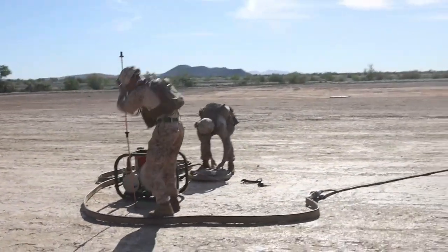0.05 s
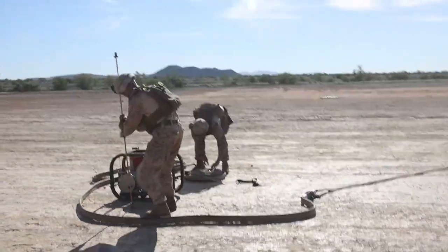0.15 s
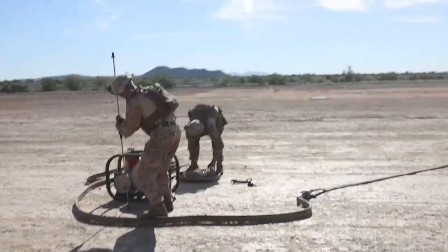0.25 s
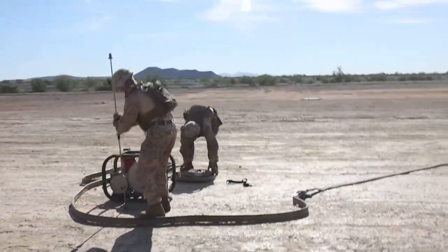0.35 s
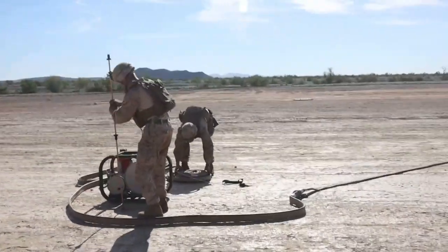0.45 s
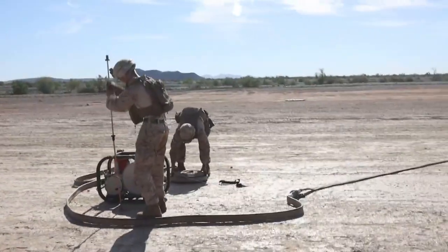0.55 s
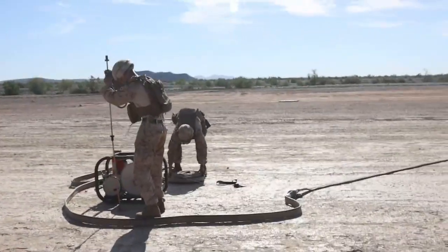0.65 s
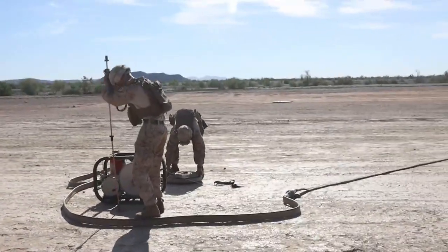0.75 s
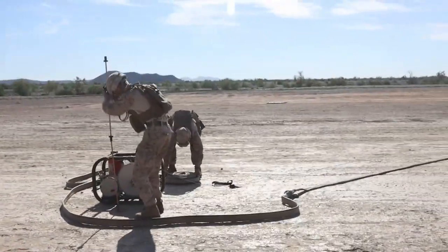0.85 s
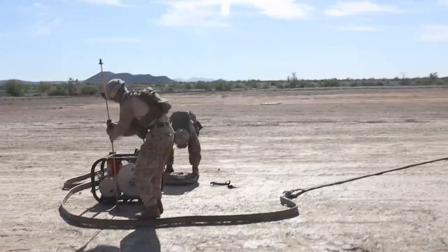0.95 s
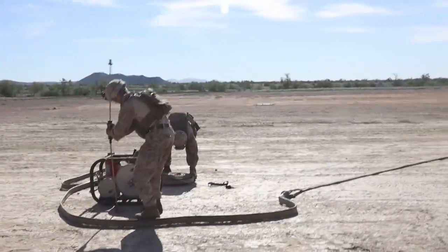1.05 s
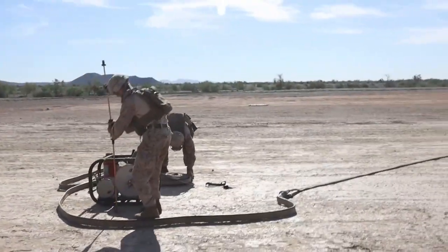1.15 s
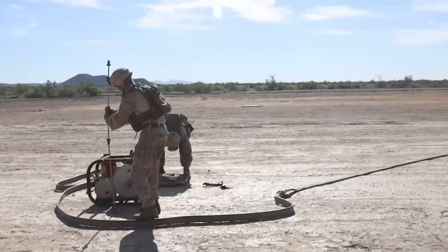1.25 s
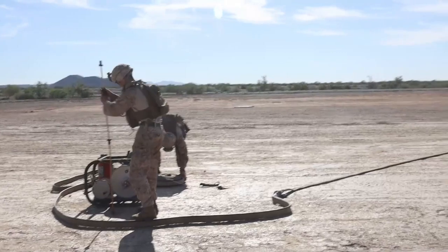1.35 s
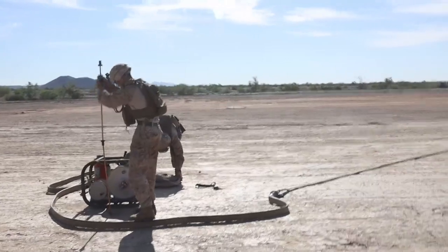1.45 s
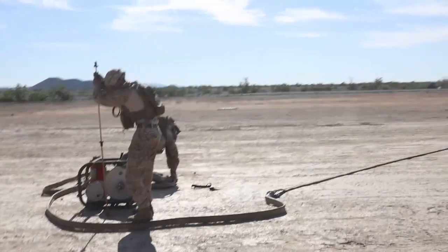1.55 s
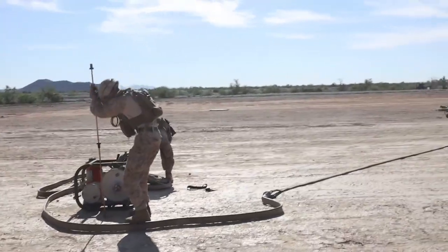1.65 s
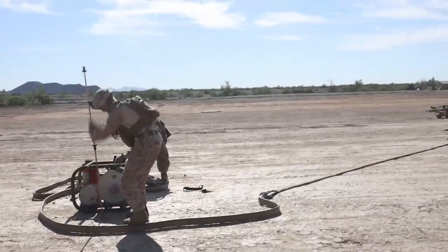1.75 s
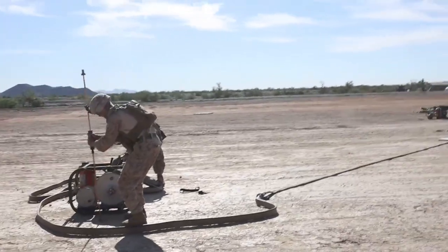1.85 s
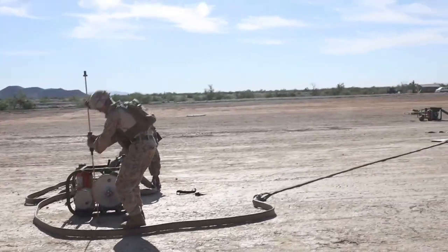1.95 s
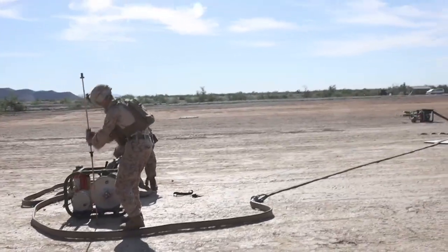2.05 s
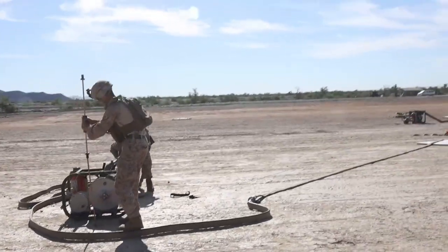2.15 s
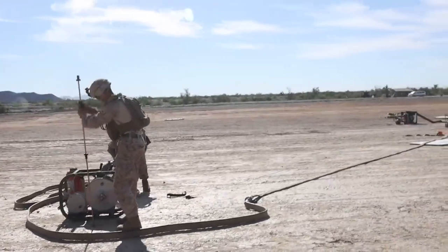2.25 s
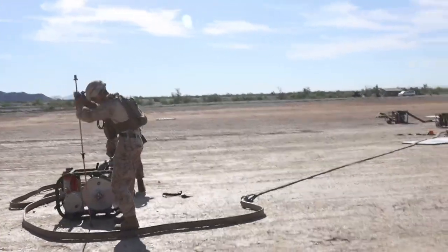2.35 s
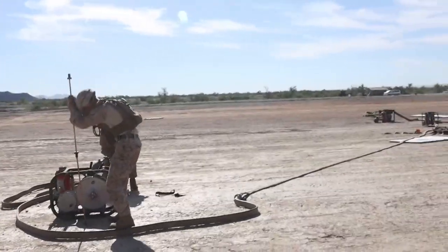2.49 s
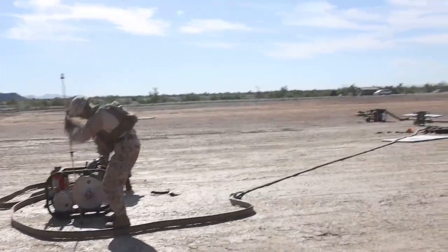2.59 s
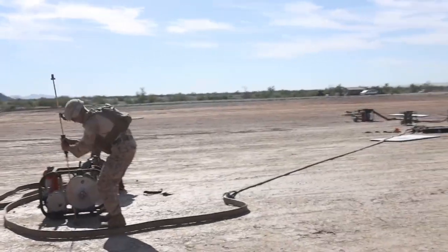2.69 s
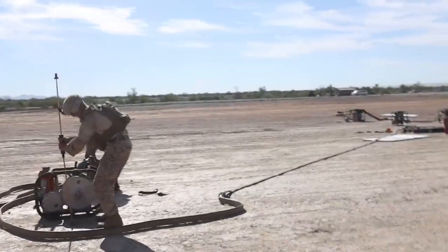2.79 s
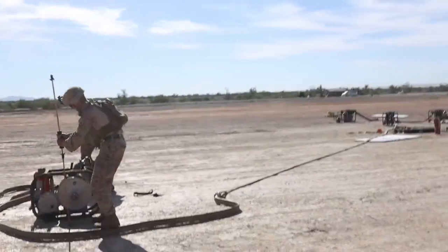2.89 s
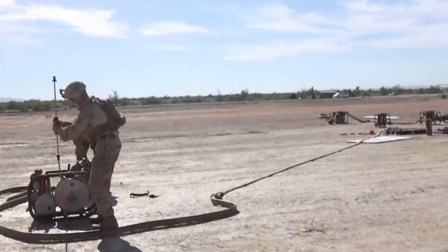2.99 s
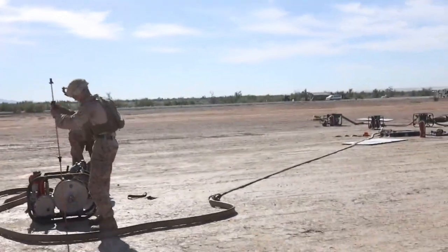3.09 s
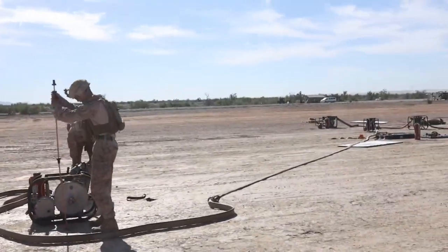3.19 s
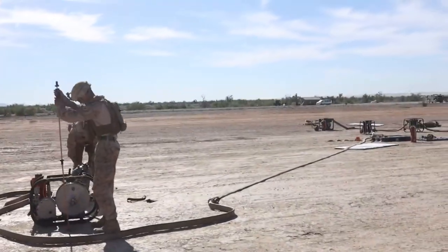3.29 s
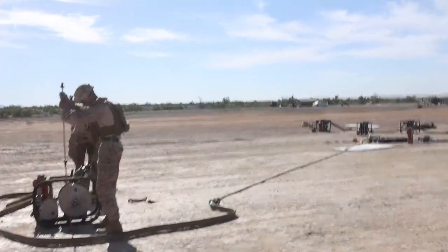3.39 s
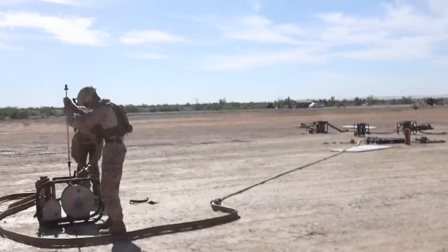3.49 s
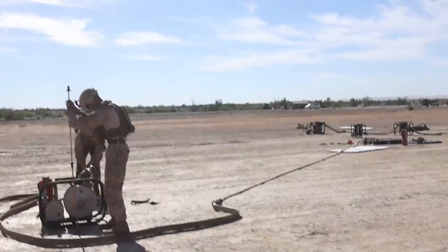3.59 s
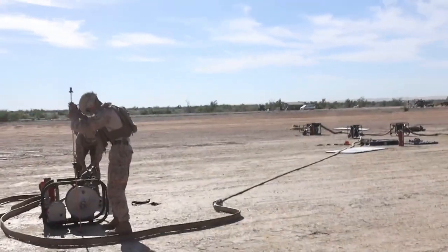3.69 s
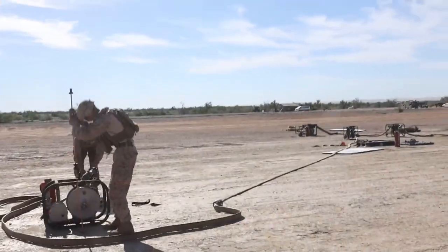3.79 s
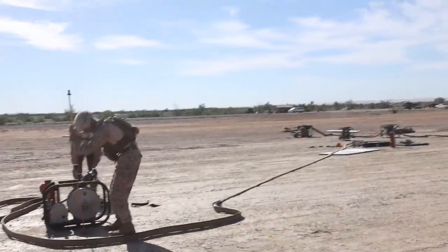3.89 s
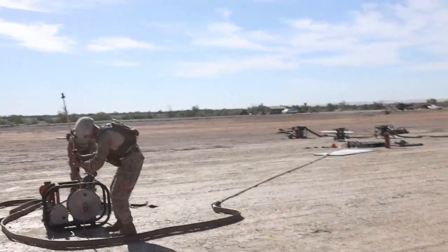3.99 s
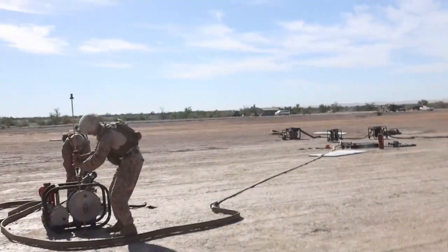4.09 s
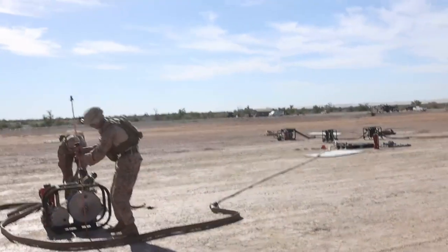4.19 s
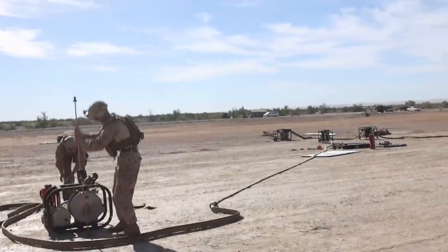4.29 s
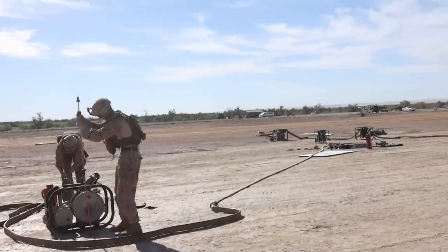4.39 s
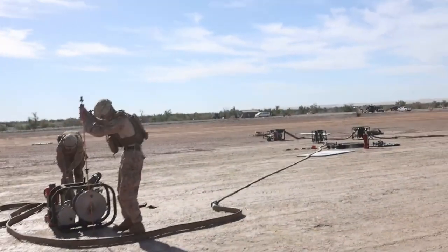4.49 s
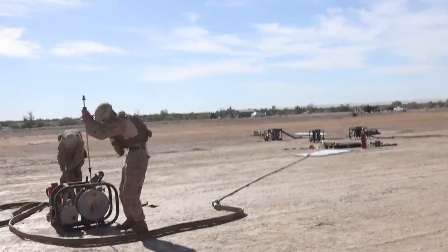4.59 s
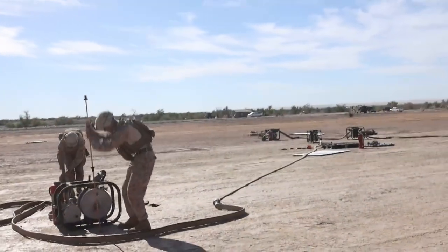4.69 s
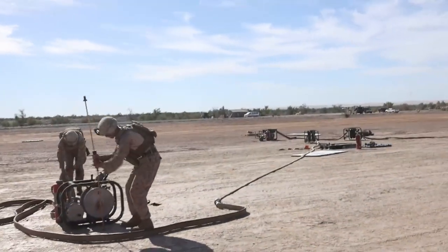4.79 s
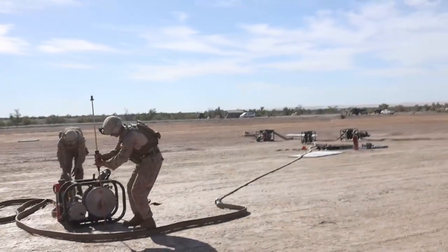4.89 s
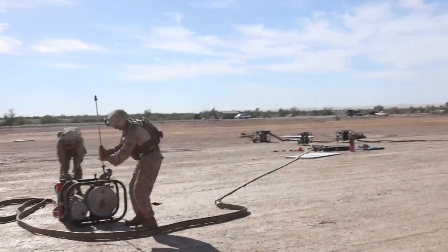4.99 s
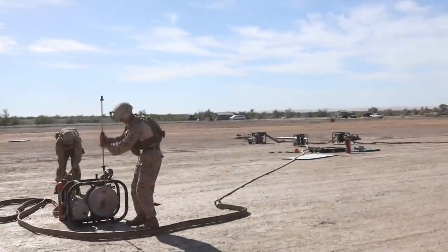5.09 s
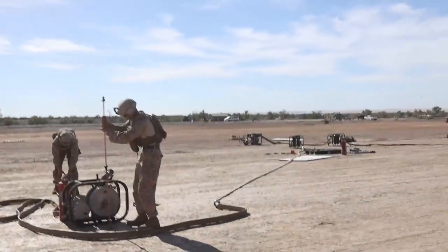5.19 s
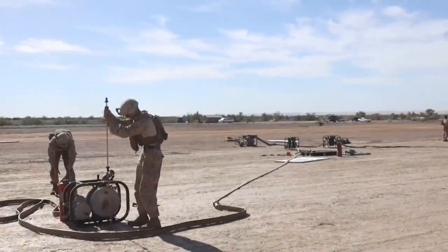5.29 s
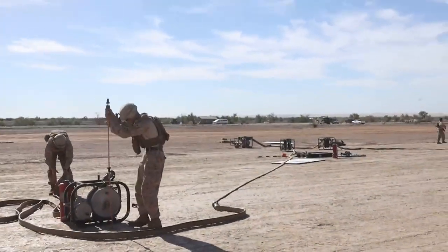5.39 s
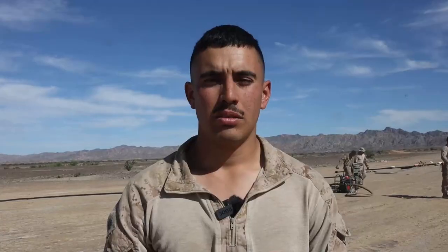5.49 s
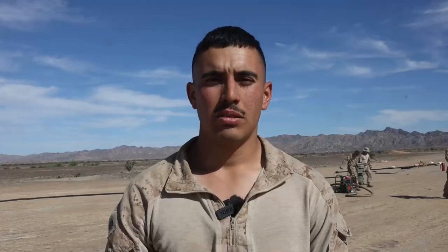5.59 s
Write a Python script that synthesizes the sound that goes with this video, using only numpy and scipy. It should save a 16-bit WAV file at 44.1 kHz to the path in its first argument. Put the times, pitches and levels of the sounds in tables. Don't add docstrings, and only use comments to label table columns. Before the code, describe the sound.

A steel sleeve slams six times onto a ground rod outdoors, with scrapes and rattles between blows and wind buffeting mainly the right side.

```python
import sys
import numpy as np
from scipy import signal
from scipy.fft import rfft, irfft
from scipy.io import wavfile
from scipy.ndimage import uniform_filter1d

SR = 44100
rng = np.random.default_rng(int(sys.argv[2]) if len(sys.argv) > 2 else 0)


def how_loud(loudness_db):
    steps = np.asarray(loudness_db, float) / 20
    return 10 ** steps


def int16_out(signal):
    q = np.round(np.clip(np.atleast_2d(signal).T, -1, 1) * 32767)
    wavfile.write(sys.argv[1], SR, q.astype(np.int16))


N = 249165

CUT_S = 5.452
PORT_LAG_SAMPLES = 3.73

# (frequency [Hz], level [dB])
DESERT_AIR = [(18, -31), (30, -5), (86, -3.5), (266, -2.5), (437, -20), (526, -16), (1010, -24),
              (2680, -28.5), (3400, -33), (3980, -34), (16000, -48.5)]
DESERT_AIR_DB = -72
# (frequency [Hz], level [dB])
QUIET_AIR = [(18, -50.5), (30, -25), (100, 4.5), (145, 4), (584, -17), (822, -27), (1190, -30), (3000, -39),
             (16000, -51)]
QUIET_AIR_DB = -73.5

# (time [s], level [dB])
GUSTS = [(0.0, -41), (0.12, -41.5), (0.2, -43.5), (0.32, -39.5), (0.55, -38.5), (0.7, -35), (0.82, -39),
         (0.96, -38.5), (1.15, -44), (1.5, -39), (1.85, -43), (2.33, -42), (2.6, -42.5), (3.0, -56.5),
         (3.4, -48.5), (3.58, -53.5), (3.83, -44), (3.93, -64)]
# (time [s], half length [s], level [dB])
RIGHT_PUFFS = [(1.7, 0.019, -43.5), (2.502, 0.01, -40.5), (4.104, 0.076, -59.5), (4.267, 0.026, -62.5),
               (4.465, 0.02, -56.5), (4.55, 0.02, -58.5), (4.752, 0.037, -56.5), (5.038, 0.066, -56.5),
               (5.283, 0.02, -53), (5.397, 0.038, -56.5)]
# (time [s], half length [s], level [dB])
LEFT_PUFFS = [(0.051, 0.043, -53), (0.6, .1, -67), (0.7, 0.031, -59.5), (1.931, 0.028, -47.5),
              (1.999, 0.019, -63), (2.36, .04, -68), (2.85, 0.12, -48.5), (2.979, 0.1, -44),
              (3.141, 0.044, -44.5), (3.333, 0.12, -47.5), (3.69, 0.078, -53.5), (3.87, 0.031, -45.5),
              (4.15, 0.089, -64), (4.299, 0.049, -51), (4.46, 0.032, -52.5), (4.93, 0.042, -56),
              (5.05, 0.054, -56)]
LEE_CALM_DB = -70.5
SHARP_SLOPE, SHARP_DB = 0.859, 22
# (time [s], peak [dB], time scale [ms])
SLAPS = [(0.131, -35, 0.61), (0.427, -37.5, 0.48), (0.489, -35.5, 0.56), (0.522, -35, 0.61),
         (0.612, -37, 0.56), (0.679, -32.5, 0.46), (0.691, -35, 0.45), (0.717, -33, 0.55),
         (0.742, -36.5, 0.41), (0.967, -32, 0.55), (1.139, -44.5, 0.66), (1.151, -36, 0.55),
         (0.845, -36.5, 0.54), (0.95, -26, 0.57), (1.049, -34, 0.57), (1.169, -40.5, 0.73),
         (1.557, -40, 0.48), (1.682, -33.5, 0.59), (2.109, -32.5, 0.74), (2.277, -32, 0.97),
         (2.355, -28.5, 0.93), (2.469, -41.5, 0.5), (2.505, -33, 0.78), (2.801, -38.5, 1),
         (3.873, -40, 0.9)]

# (time [s], peak [dB], grit [dB], length [ms])
SCUFFS = [(0.078, -50.5, -8, 7.6), (1.342, -43, 2, 3.7), (1.376, -28.5, -9, 1.5), (3.16, -47, -13, 8.5),
          (3.242, -64.5, 2, 11.3), (3.303, -51.5, -3, 2.8), (3.381, -49.5, -2, 3), (3.401, -52.5, 5.5, 5),
          (4.098, -63.5, 19, 4.8), (4.436, -53.5, -9, 5.1), (4.447, -67.5, -5, 31), (4.497, -66, -1.5, 15),
          (4.521, -50.5, -0.5, 2.4), (5.018, -53, -2.5, 3.2), (5.04, -47, -10, 9.5),
          (5.054, -64.5, 10, 15.4), (5.174, -57.5, 0, 5.9)]
# (frequency [Hz], level [dB])
SOIL = [(80, -19.5), (400, 5), (1200, -11), (3500, -16.5), (8000, -33.5), (16000, -73)]

ROD_HZ = [4250, 5040, 5950, 6630, 7500, 8520, 9470, 10500, 11600, 12700, 13800, 14400]
# (level [dB], time to fall 60 dB [s])
ROD_RING = [(-5.5, .07), (-3, 0.076), (-9, 0.079), (2, .09), (-8.5, 0.06), (-6.5, 0.087), (-4, 0.057),
            (-4.5, .09), (-4.5, 0.05), (-7, .09), (-5, .1), (-13.5, 0.14)]
# (frequency [Hz], level [dB], time to fall 60 dB [s])
LINGER = [(2440, -28.5, 0.079), (3390, -17.5, .12), (5440, -28.5, 0.16), (5500, -25, 0.077),
          (6583, -23.5, 0.23), (8470, -24, 0.093), (9450, -29, 0.052), (11000, -29.5, 0.088),
          (11500, -31.5, 0.051), (14500, -27, 0.097)]
TICK_RING_DB = 3
# (time [s], level [dB], treble [dB])
CHIMES = [(0.054, -79, -23), (0.243, -67.5, 1), (1.069, -67, -1.5), (1.125, -72, 6), (1.201, -71, -10),
          (1.248, -69, -6), (1.3, -62, 3), (1.3456, -60, -8), (1.439, -75, -1), (1.897, -68.5, -14.5),
          (2.081, -74, -10), (2.114, -81, -4), (2.743, -77, -8), (2.77, -85, -10), (2.932, -90, -5.5),
          (3.01, -84, -7), (3.048, -84, -2), (3.072, -71.5, -2), (3.664, -81.5, -8), (4.393, -75, -11),
          (5.191, -67, 3.5)]

# (frequency [Hz], level [dB], time to fall 60 dB [s])
SLEEVE = [
    (3420, 2.5, 0.0044),
    (3663, -6, 0.017),
]
# (frequency [Hz], level [dB], time to fall 60 dB [s])
LOOSE = [(2207, -10.5, 0.025), (3180, -1.5, 0.028), (4600, -6, 0.1), (5465, -3, 0.021), (5683, 2, 0.016),
         (6600, 6, 0.12), (7320, -13.5, 0.019), (8460, -3.5, 0.017), (9900, -13, 0.016),
         (10500, -13, 0.032), (12100, -15, 0.016), (12500, -24, 0.081), (13900, -22, 0.12),
         (13300, -12, 0.059)]
LONGEST_T60_S = 0.07
# (frequency [Hz], level [dB])
TAP = [(500, -36.5), (1200, -14), (2200, -4), (3500, -9.5), (6000, 8), (8600, -25.5), (11500, -33.5),
       (14000, -32.5), (14800, -43.5), (16000, -60.5)]
# (time [s], peak [dB], sleeve ring [dB], treble [dB], contact [ms])
BOUNCES = [(0.1449, -64.5, 16.5, 14.5, 1.8), (0.22, -46, 0.5, -3, 3.8), (0.2418, -49, -2, -3, 3.1),
           (1.0113, -41.5, -13, -8.5, 3.8), (1.0687, -44.5, -28, -1, 4.4), (1.8973, -47.5, -25, 3.5, 6.6),
           (1.91, -60, -10, -10, 2.4), (2.742, -43.5, -27, 1, 1.9), (2.77, -56.5, -14, -13.5, 13),
           (4.01, -46, -31.5, 2, 2.5), (4.072, -43, -5, 4.5, 1.2), (4.0873, -61, 0, -13, 6.7),
           (4.7574, -67.5, 23, -4.5, 5.07), (4.803, -51.5, 10, -5, 6.2), (4.8449, -38.5, 8, -2.5, 2.6),
           (4.9392, -61.5, 7, -6, 5.1)]
# (time [s], peak [dB], sleeve ring [dB], treble [dB])
RATTLES = [(0.0537, -59, -38, -16), (0.609, -62, -30, -9), (1.1262, -50.5, -3, -24),
           (1.2, -52.5, 1.5, -14.5), (1.248, -49.5, 8, -7), (1.3008, -51.5, -18, -8.5),
           (1.3455, -62.5, -13, 0), (1.388, -59.5, 18, 5), (1.4387, -59.5, 4.5, 0), (2.08, -54.5, 5, -4),
           (2.1147, -58.5, -13, -3), (2.8866, -71.5, -9, -7.5), (2.932, -51.5, -25, -5),
           (3.0114, -65, -34, -10.5), (3.048, -64.5, -18, -12), (3.072, -59.5, 7, -0.5),
           (3.1646, -70, 19.5, -3.5), (3.6634, -62.5, 10.5, 1), (4.3915, -62, 17, -7.5),
           (5.063, -62.5, 31, -23), (5.1917, -58.5, 8, -3.5), (5.2603, -70.5, 21, -5),
           (0.0287, -76, -10, -20), (0.0925, -70, -9, -18), (1.164, -70, -10, -38),
           (1.2362, -61.5, -2, -32), (1.2887, -66, 14, -20), (1.3363, -64, -1, -15), (1.3698, -64, 14, -14),
           (1.4465, -62.5, -6, -1), (1.514, -72.5, -7, -25), (2.7343, -65.5, -20, 4),
           (2.8598, -72, -9.5, -21), (2.9937, -70, -8, -4), (3.128, -71.5, -5, -15)]
RATTLE_CONTACT_MS = 7.1

# (frequency [Hz], level [dB])
SCRAPE = [(700, -31), (1300, -11), (2300, -7.5), (4500, -10), (6600, -20.5), (10400, -31.5), (16000, -44)]
# (time [s], half length [s], scrape [dB], sleeve ring [dB])
LIFTS = [(0.096, 0.12, -71.5, -98), (0.235, 0.048, -59.5, -69), (0.543, 0.16, -76, -85),
         (1.318, 0.072, -66, -69), (1.96, 0.055, -76.5, -86.5), (2.222, 0.13, -82, -86),
         (1.536, 0.21, -84, -93.5), (3.031, 0.075, -75, -81.5), (3.152, 0.064, -93.5, -84.5),
         (3.411, 0.06, -81, -102.5), (4.302, 0.11, -80.5, -78.5), (4.426, 0.073, -82, -82),
         (4.752, 0.04, -88.5, -68), (4.866, 0.047, -64.5, -87), (5.155, 0.084, -79.5, -78.5),
         (5.273, 0.055, -87, -79.5), (5.361, 0.058, -94, -88)]
# (scrape [dB], sleeve ring [dB])
DROPS = [
    (-61.5, -66.5),
    (-54.5, -69),
    (-58.5, -71),
    (-57, -69.5),
    (-62, -67.5),
    (-65, -67),
]
DROP_RISE_DB_PER_S, DROP_FADE_DB_PER_S = 211.5, 262
SLIDE_REST_DB = -100

# (time [s], peak [dB], sleeve ring [dB], thud [dB], treble [dB])
BLOWS = [
    (0.194, -21.5, -11.5, -16, -0.5),
    (0.9882, -21, -7, -16, 5),
    (1.8221, -22, -9, -34, 1),
    (2.6627, -16.5, 0.5, -17, -1.5),
    (3.9845, -19, 3, -22.5, 4.5),
    (4.822, -20, -4, -16, 2.5),
]
LANDING_HZ = (750, 1600, 3500, 8500, 13500)
# (knock [dB], body [dB], shank [dB], edge [dB])
LANDINGS = [
    (-3.5, -4.5, -0.5, 1),
    (0.5, -2, -3, -0.5),
    (-5, -3.5, -5, 4.5),
    (-2.5, 0.5, 0, 0),
    (2, 3, 6.5, -0.5),
    (0, -3.5, -1.5, -1),
]
# (frequency [Hz], level [dB])
CRACK = [(300, -35), (500, -23), (750, -10.5), (1200, -17), (2000, -8.5), (2800, -15), (3500, -8.5),
         (5000, -12), (6500, -9), (8600, -24), (13800, -23.5), (15300, -24), (16000, -44)]
# (frequency [Hz], level [dB], time to fall 60 dB [s])
STEEL = [(4091, -9.5, 0.084), (3860, 0, 0.084), (4200, -7.5, 0.08), (4820, -4.5, 0.074),
         (5270, -8.5, 0.093), (6600, -4, 0.073), (6820, -4.5, 0.2), (6860, -10, 0.085), (7060, -12, 0.1),
         (8300, -3.5, 0.015), (8570, -0.5, 0.059), (9800, -11, 0.035), (9960, -4.5, 0.059),
         (9200, -11, 0.081), (12300, -5, 0.0091), (10500, -15.5, 0.073), (11940, -15.5, 0.069),
         (11600, -17, 0.052), (16160, -20, 0.036)]
COLLAR_HZ, COLLAR_DB, COLLAR_T60_S = 6480, -12.5, 0.03

RELAND_MS, RELAND_DB = 5.4, -4
RELAND_ABOVE_HZ = 1600
# (frequency [Hz], level against the left port [dB])
SHADE = [(800, 2), (1300, 3.5), (1850, 4.5), (2600, 4), (3500, 0.5), (6000, 3), (11500, 0), (14000, -3)]


def highpass(x, order, hz):
    return signal.sosfilt(signal.butter(order, hz, "high", fs=SR, output="sos"), x)


def colour(x, spectrum, tilt_db=0):
    hz = np.fft.rfftfreq(x.shape[-1], 1 / SR) + 1
    points = np.array(spectrum)
    db = np.interp(np.log(hz), np.log(points[:, 0]), points[:, 1])
    db = db + tilt_db * np.log(hz / 3500) / np.log(4)
    y = irfft(rfft(x) * how_loud(db), x.shape[-1])
    return y / np.sqrt(np.mean(y ** 2))


def walk(rate):
    k = int(SR / rate)
    held = np.repeat(rng.standard_normal(N // k + 1), k)
    return 1.3 * uniform_filter1d(uniform_filter1d(held, k), k)[:N]


def add(out, x, s):
    i = int(s * SR)
    out[..., i:i + x.shape[-1]] += x[..., :N - i]


def later(x, samples):
    return irfft(rfft(x) * np.exp(-2j * np.pi * np.fft.rfftfreq(N) * samples), N)


def swells(rest_db, s, half_s, db):
    away = (np.arange(0, N, 32)[:, None] / SR - s) / half_s
    power = np.sum(how_loud(db - 9.5 * np.minimum(away ** 2, 20)) ** 2, axis=1)
    return 10 * np.log10(how_loud(rest_db) ** 2 + np.repeat(power, 32)[:N])


def ring(modes, t, scatter_db, tilt_db=0, damp=1.0):
    hz, db, t60 = np.array(modes).T[:, :, None]
    chance = rng.standard_normal((2, len(modes), 1))
    gain = how_loud(db + scatter_db * chance[0] + tilt_db * np.log(hz / 3500) / np.log(4))
    decay = how_loud(-60 * t / (damp * np.minimum(t60, LONGEST_T60_S)))
    y = np.sum(gain * np.sin(2 * np.pi * (hz * t + chance[1])) * decay, axis=0)
    return y / np.sqrt(np.sum(y ** 2))


def air(spectrum, db):
    mid, side = rng.standard_normal((2, N))
    side = highpass(side, 1, 900)
    return colour(np.array([mid + side, mid - side]), spectrum) * how_loud(db + 1.5 * walk(6))


def wind(gust_db, sharp_db, flurry_db):
    out = np.zeros(N)
    chance = rng.random((5000, 4))
    flutter_db = flurry_db * walk(30)
    for when, size, width, sign in chance:
        i = int(when * N)
        ms = 1.56 * how_loud(-0.4 * (sharp_db[i] + 12) - 10.46 * width ** 1.352 - 0.4 * flutter_db[i])
        u = np.arange(-5, 5, 1000 / (ms * SR))
        grain = u / np.cosh(1.08 * u) ** 2 * np.sign(sign - 0.5) * ms ** 0.74
        add(out, grain * how_loud(-2.2 * np.log(1 - size)), i / SR)
    out = highpass(out, 2, 95) * how_loud(flutter_db)
    even = uniform_filter1d(uniform_filter1d(out ** 2, size=3500), size=3500)
    return out / np.sqrt(even) * how_loud(gust_db)


def slaps():
    out = np.zeros(N)
    t_ms = np.arange(-220, 220) / SR * 1000
    for s, peak_db, ms in SLAPS:
        u = t_ms / ms
        add(out, u / np.cosh(0.96 * u) ** 2 * how_loud(peak_db + 10), s - 0.003)
    return out


def scuffs():
    out, t = np.zeros(N), np.arange(4000) / SR
    for s, peak_db, grit_db, ms in SCUFFS:
        grit = rng.standard_normal(len(t)) * how_loud(9.0 * rng.standard_normal(len(t)))
        shape = np.minimum(t / 0.0041, 1) * np.exp(-1000 * t / ms)
        add(out, colour(grit, SOIL, grit_db) * shape * how_loud(peak_db - 2), s - 0.001)
    return out


def linger():
    out, t = np.zeros(N), np.arange(6000) / SR
    hz, db, t60 = np.array(LINGER).T[:, :, None]
    hits = [row[:2] for row in BLOWS]
    hits += [(row[0], row[1] + TICK_RING_DB) for row in BOUNCES + RATTLES]
    for s, peak_db in hits:
        flutter = uniform_filter1d(rng.standard_normal((len(hz), len(t))), size=260) * 16
        gain = how_loud(peak_db + db - 6.0 - 60 * t / t60)
        add(out, np.sum(flutter * np.sin(2 * np.pi * hz * t) * gain, axis=0), s)
    return out


def chimes():
    out, t = np.zeros(N), np.arange(6000) / SR
    hz, db, t60 = np.column_stack([ROD_HZ, ROD_RING]).T[:, :, None]
    for s, peak_db, treble_db in CHIMES:
        chance = rng.standard_normal((2, len(hz), 1))
        tone_db = peak_db + db + 4.5 * chance[0] + treble_db * np.log(hz / 7000) / np.log(2)
        gain = how_loud(tone_db - 75 * t / t60)
        flutter = 1 + 12 * uniform_filter1d(rng.standard_normal((len(hz), len(t))), size=400)
        tones = np.sum(flutter * gain * np.sin(2 * np.pi * (hz * t + chance[1])), axis=0)
        add(out, np.minimum(t / 0.0045, 1) * tones, s)
    return out


def slide_db(drop_db, lift_db):
    late = np.arange(N)[:, None] / SR - np.transpose(BLOWS)[0]
    drops = how_loud(drop_db + np.where(late < 0, DROP_RISE_DB_PER_S, -DROP_FADE_DB_PER_S) * late)
    s, half_s = np.transpose(LIFTS)[:2]
    lifts = how_loud(swells(SLIDE_REST_DB, s, half_s, lift_db))
    return 20 * np.log10(np.hypot(np.sum(drops, axis=1), lifts))


def sliding():
    drop_scrape, drop_ring = np.transpose(DROPS)
    lift_scrape, lift_ring = np.transpose(LIFTS)[2:]
    scrape_db = slide_db(drop_scrape, lift_scrape)
    ring_db = slide_db(drop_ring, lift_ring)
    t, now = np.arange(6000) / SR, np.arange(N) / SR
    rough_db = 4 * np.clip(walk(90), -3, 1.3) + 4 * rng.standard_normal(N)
    grit = rng.standard_normal((2, N)) * how_loud(rough_db)
    pitch = 3440 * (1 + 0.012 * walk(25) + 0.025 * walk(500))
    sing = np.sin(2 * np.pi * np.cumsum(pitch) / SR) * how_loud(5.5 * walk(45) + 4.0 * walk(160))
    rod = ring(np.column_stack([ROD_HZ, ROD_RING]), t, 2.0, -6)
    shiver = signal.fftconvolve(grit[1], rod)[:N]
    scrape = colour(grit[0], SCRAPE) + how_loud(-11.5) * shiver / np.std(shiver)
    slide = scrape * how_loud(scrape_db - 8.5) + sing / np.std(sing) * how_loud(ring_db - 4.5)
    return slide * (now < CUT_S)


def strike(spectrum, modes, modes_db, ring_db, treble_db, contact_ms, tail_db, tail_t60, free):
    t = np.arange(6000) / SR
    push = np.minimum(t / 0.0005, 1) * np.exp(-(1000 * t / contact_ms) ** 4)
    clicks = rng.standard_normal((2, len(t))) * how_loud(2.5 * rng.standard_normal(len(t)))
    chatter = clicks[0] * push
    crack = colour(clicks[0], spectrum, treble_db) * (push + how_loud(-3.5 - 60 * t / 0.053))
    steel = signal.fftconvolve(chatter, ring(modes, t, 2.4, treble_db, damp=0.19))[:len(t)]
    steel = steel * 3 / np.max(np.abs(steel))
    drive = push * np.sin(2 * np.pi * SLEEVE[0][0] * t) + 0.3 * chatter
    sleeve = signal.fftconvolve(drive, ring(SLEEVE, t, 2.0, damp=free))[:len(t)]
    sleeve = sleeve * 3 / np.max(np.abs(sleeve))
    tail = colour(clicks[1], spectrum, treble_db - 11.5)
    tail = colour(tail, [(13800, -1), (15000, -17.5)])
    tail = tail * np.minimum(t / 0.0053, 1) * how_loud(tail_db - 60 * t / tail_t60)
    y = crack + how_loud(modes_db) * steel + how_loud(ring_db) * sleeve + tail
    return y / np.max(uniform_filter1d(np.abs(y), size=88))


def ticks():
    out = np.zeros(N)
    touches = BOUNCES + [(*row, RATTLE_CONTACT_MS) for row in RATTLES]
    for s, peak_db, ring_db, treble_db, contact_ms in touches:
        tick = strike(TAP, LOOSE, 0.42, ring_db - 11.5, treble_db, contact_ms,
                      tail_db=-8, tail_t60=0.07, free=0.82)
        add(out, tick * how_loud(peak_db - 5.5), s - 0.0004)
    return out


def blows():
    out, t = np.zeros(N), np.arange(6000) / SR
    for row, (knock, body, shank, edge) in zip(BLOWS, LANDINGS):
        s, peak_db, ring_db, thud_db, treble_db = row
        clamp = np.sin(2 * np.pi * 760 * t) * how_loud(-60 * t / 0.011)
        thump = how_loud(-1.5) * np.sin(2 * np.pi * 125 * t) * how_loud(-60 * t / 0.044)
        collar = np.sin(2 * np.pi * COLLAR_HZ * t) * how_loud(COLLAR_DB - 60 * t / COLLAR_T60_S)
        hit = strike(CRACK, STEEL, -8.0, ring_db, treble_db, contact_ms=4.4,
                     tail_db=-24.0, tail_t60=0.13, free=0.84)
        blow = hit + how_loud(thud_db) * (clamp + thump) + collar
        landing = list(zip(LANDING_HZ, (knock, body, 0, shank, edge)))
        blow = colour(np.roll(blow, 88), landing) * np.std(blow)
        add(out, blow * how_loud(peak_db - 4.5), s - 0.0019)
    return out


def reland(x, shared):
    t = np.arange(90) / SR
    facets = (shared + 0.45 * rng.standard_normal(len(t))) * np.exp(-t / 0.0014)
    again = signal.fftconvolve(x, facets / np.sqrt(np.sum(facets ** 2)))[:N]
    again = np.roll(again, int(RELAND_MS * SR / 1000))
    return x + how_loud(RELAND_DB) * highpass(again, 2, RELAND_ABOVE_HZ)


def scene():
    now = np.arange(N) / SR
    before = np.clip((CUT_S - now) / 0.0097, 0, 1)
    airs = before * air(DESERT_AIR, DESERT_AIR_DB) + (1 - before) * air(QUIET_AIR, QUIET_AIR_DB)

    left_db = swells(LEE_CALM_DB, *np.transpose(LEFT_PUFFS))
    right_db = swells(np.interp(now, *np.transpose(GUSTS)), *np.transpose(RIGHT_PUFFS))
    lee = wind(left_db - 1.5, np.full(N, -27.0), flurry_db=5.5)
    exposed = wind(right_db, SHARP_SLOPE * right_db + SHARP_DB, flurry_db=2.5) + slaps()

    near = np.array([blows(), ticks() + sliding() + scuffs()])
    shaded = colour(near, SHADE) * np.std(near)
    facets = 3 * (0.4 * rng.standard_normal(90) + (np.arange(90) == 0))
    left = how_loud(2.3) * (reland(near[0], facets) + how_loud(3.0) * near[1])
    right = how_loud(2.22) * later(reland(shaded[0], facets) + how_loud(4.0) * shaded[1], PORT_LAG_SAMPLES)
    rod = linger() + chimes()
    left = left + rod + lee
    right = right + later(rod, PORT_LAG_SAMPLES) + exposed
    return before * np.array([left, right]) + airs


def band_limit(x):
    return signal.sosfilt(signal.butter(12, 16420, fs=SR, output="sos"), x)


def record(dry):
    soft = 0.17 * np.tanh(highpass(dry, 1, 50) / 0.17)
    mix = signal.sosfilt(signal.cheby1(8, 1, 14900, fs=SR, output="sos"), soft)
    return band_limit(mix)


dry = scene()
out = record(dry)
int16_out(out)
```